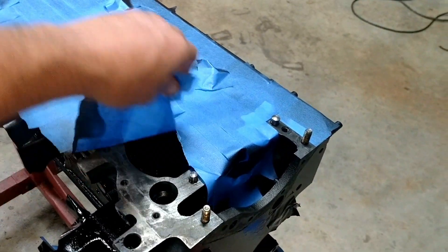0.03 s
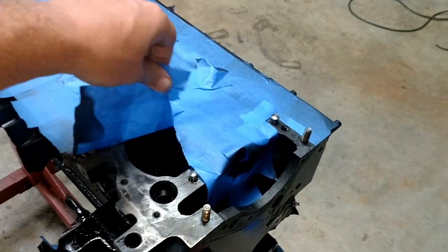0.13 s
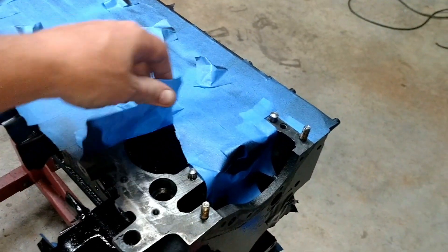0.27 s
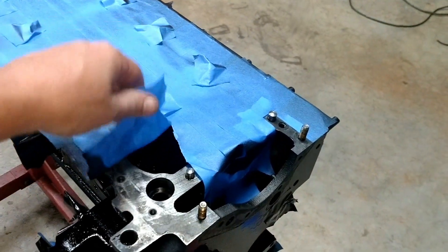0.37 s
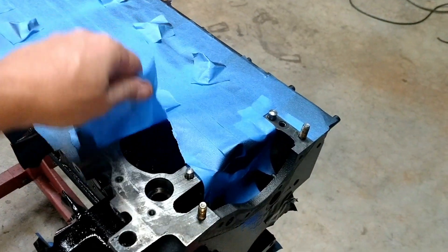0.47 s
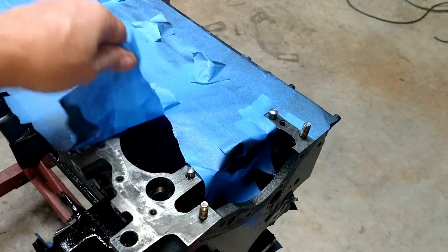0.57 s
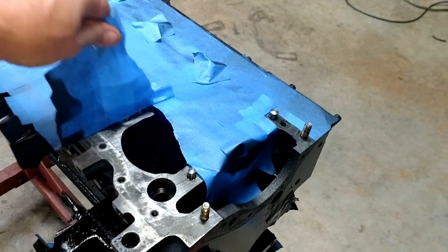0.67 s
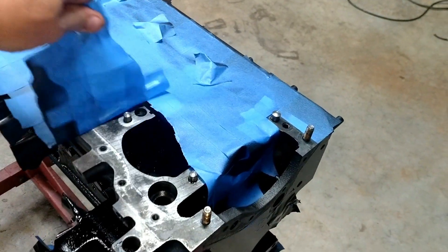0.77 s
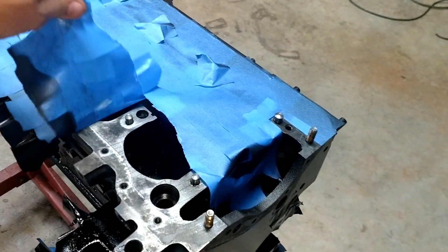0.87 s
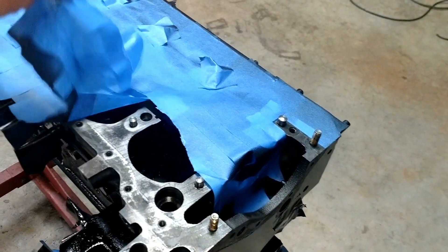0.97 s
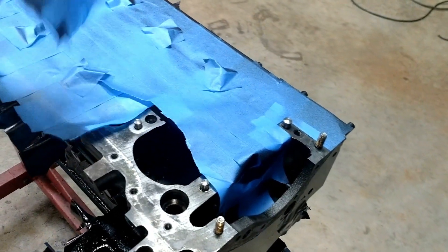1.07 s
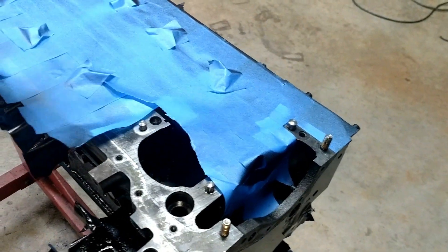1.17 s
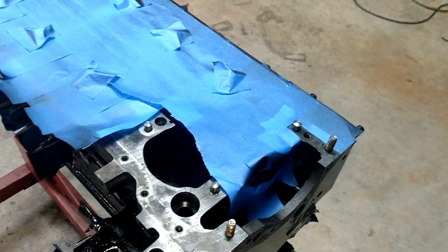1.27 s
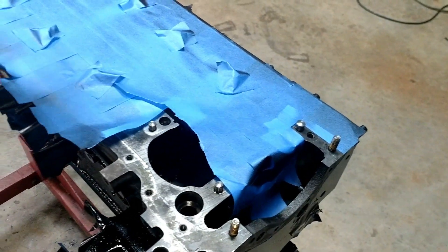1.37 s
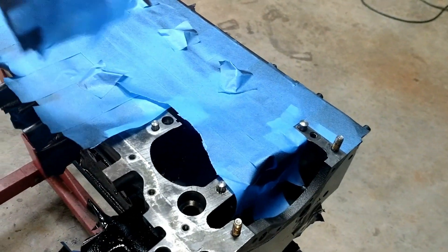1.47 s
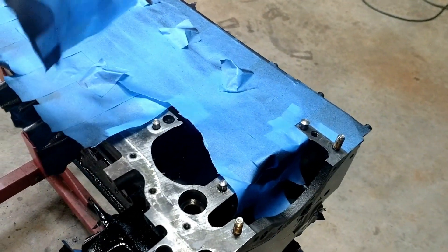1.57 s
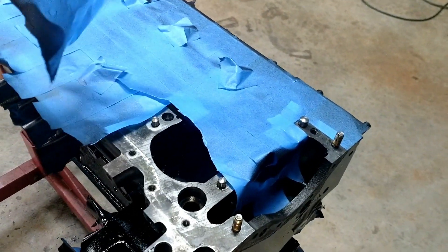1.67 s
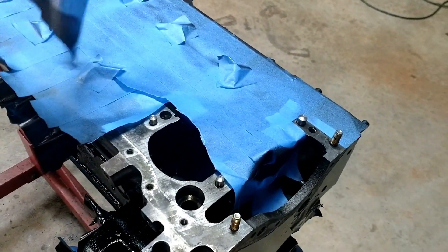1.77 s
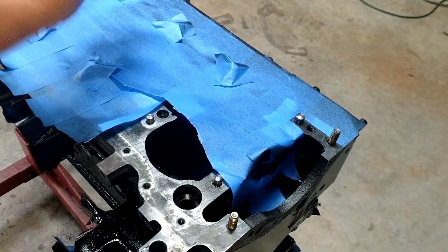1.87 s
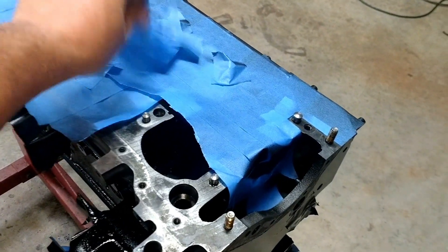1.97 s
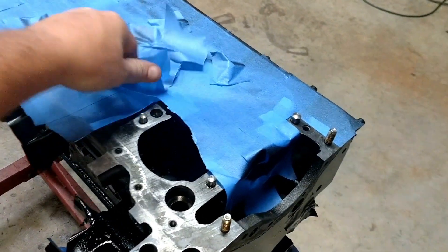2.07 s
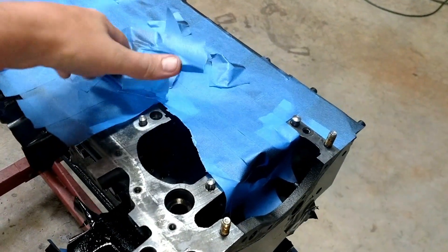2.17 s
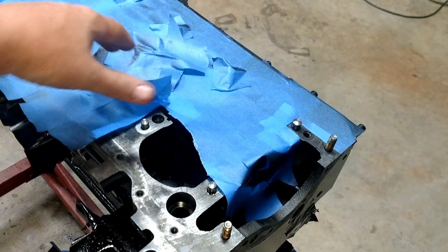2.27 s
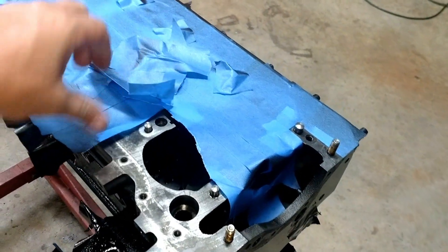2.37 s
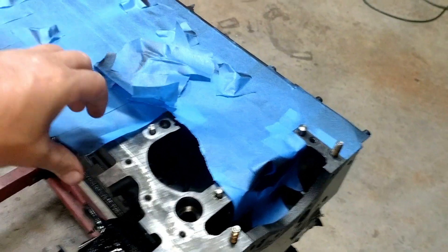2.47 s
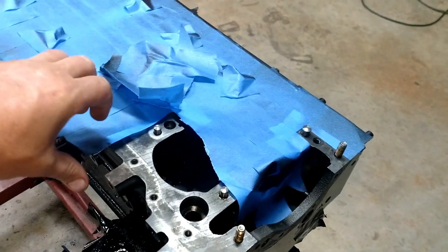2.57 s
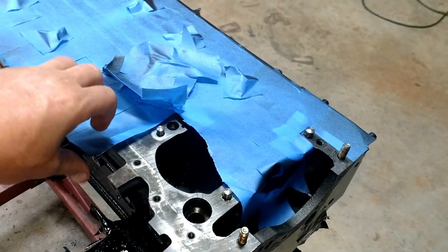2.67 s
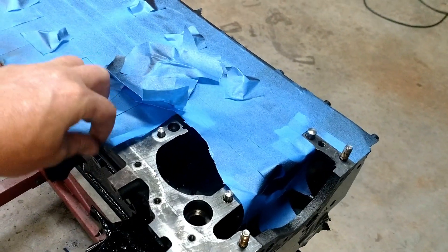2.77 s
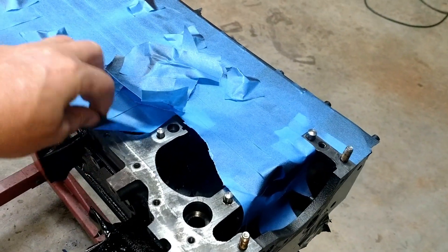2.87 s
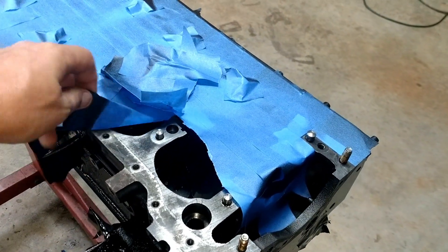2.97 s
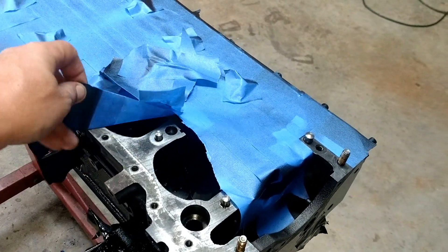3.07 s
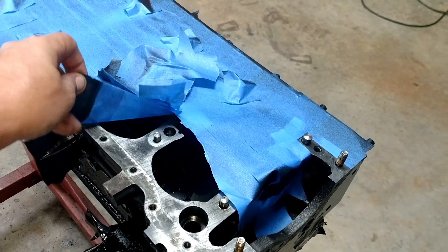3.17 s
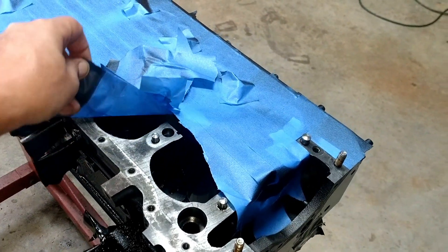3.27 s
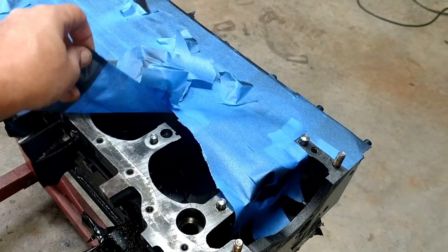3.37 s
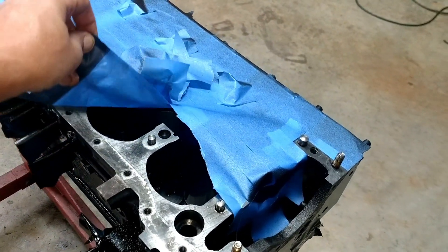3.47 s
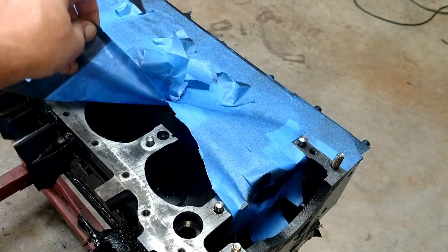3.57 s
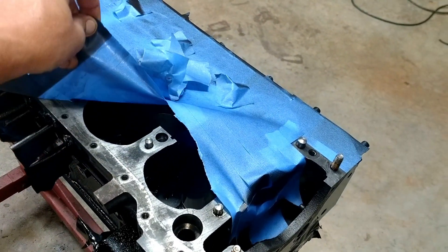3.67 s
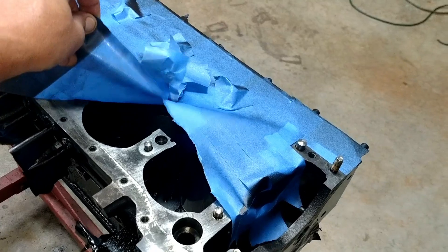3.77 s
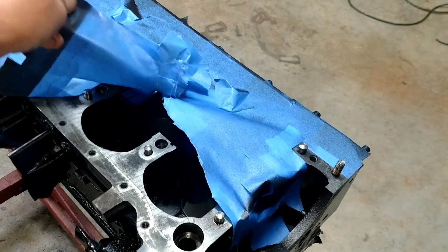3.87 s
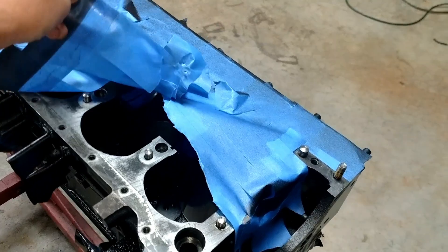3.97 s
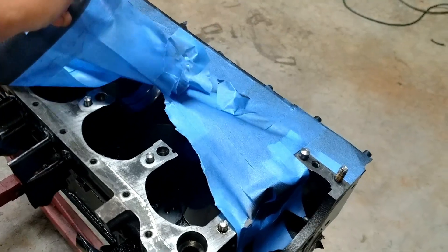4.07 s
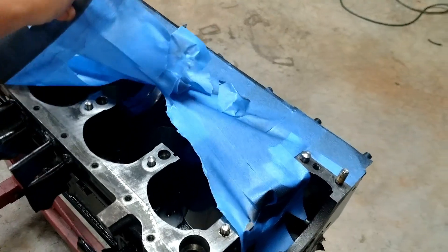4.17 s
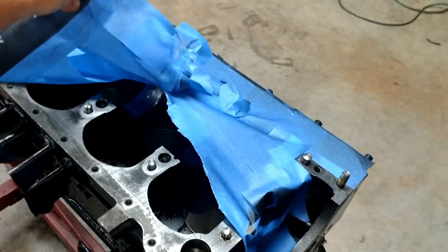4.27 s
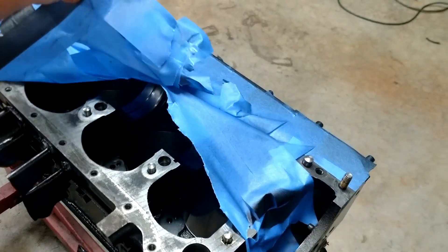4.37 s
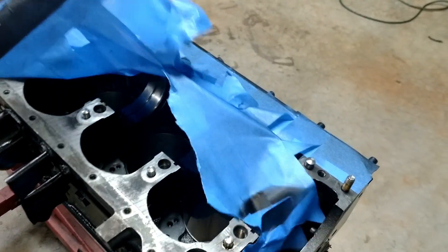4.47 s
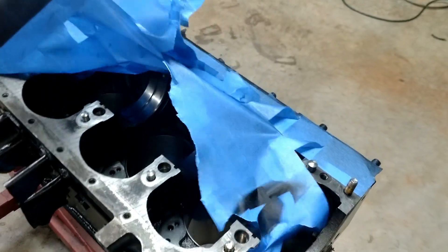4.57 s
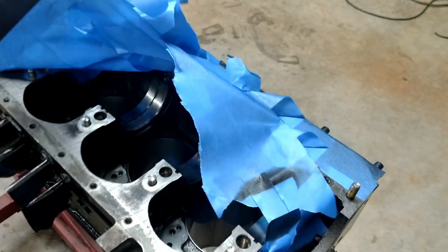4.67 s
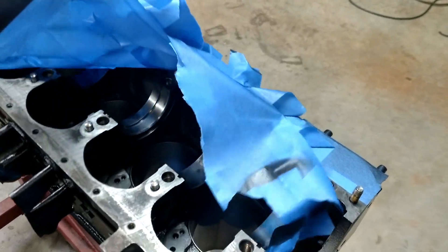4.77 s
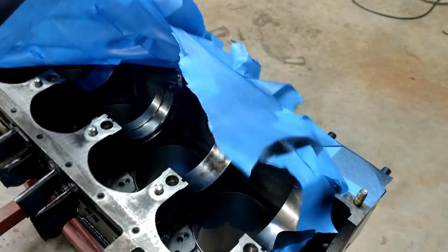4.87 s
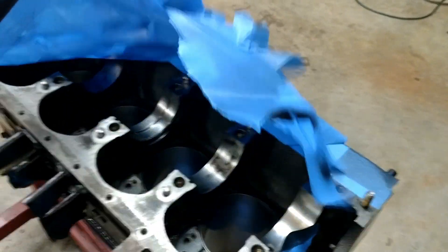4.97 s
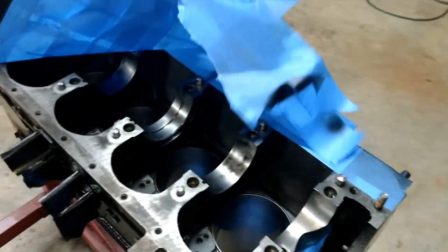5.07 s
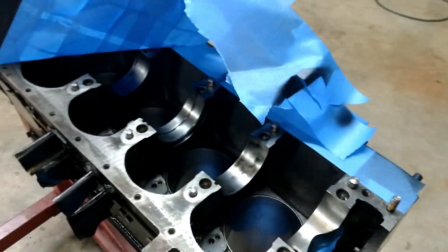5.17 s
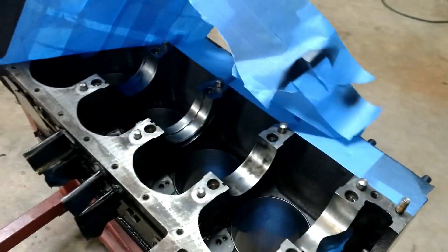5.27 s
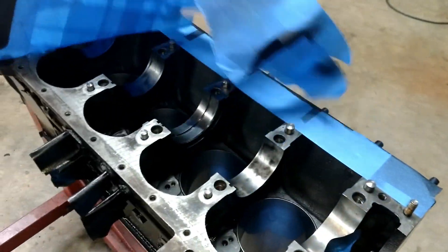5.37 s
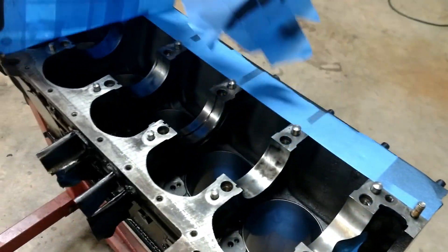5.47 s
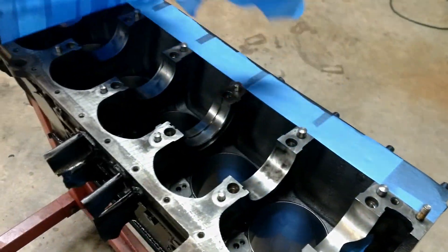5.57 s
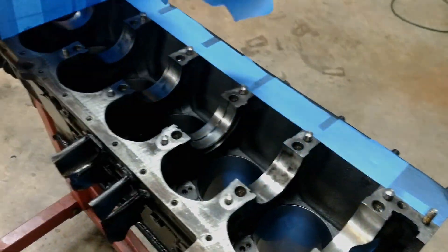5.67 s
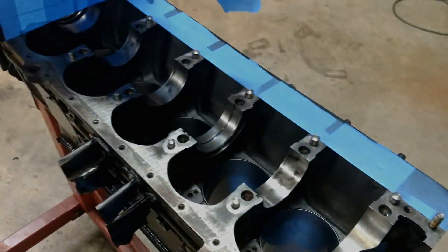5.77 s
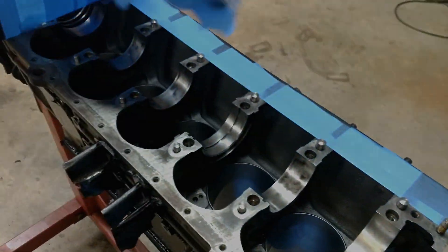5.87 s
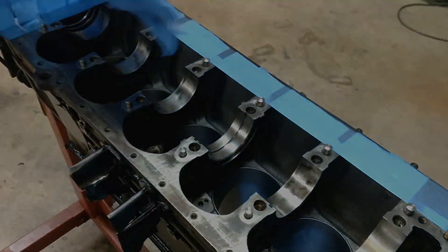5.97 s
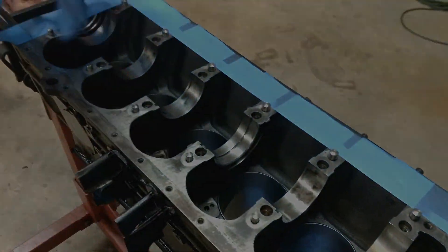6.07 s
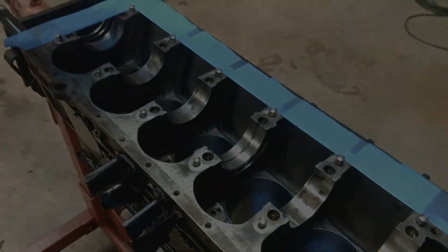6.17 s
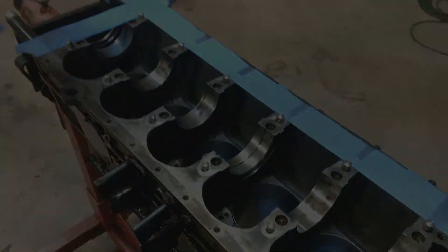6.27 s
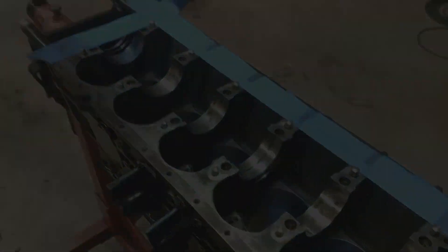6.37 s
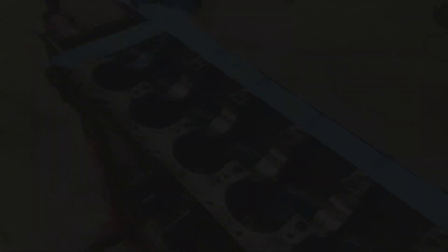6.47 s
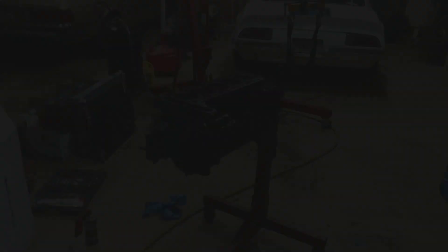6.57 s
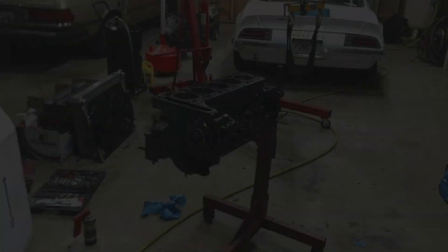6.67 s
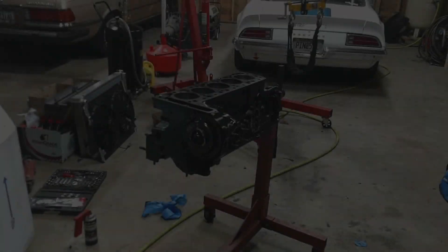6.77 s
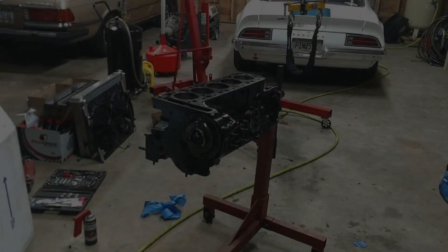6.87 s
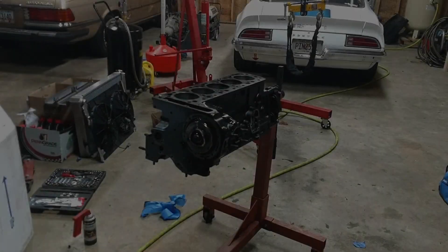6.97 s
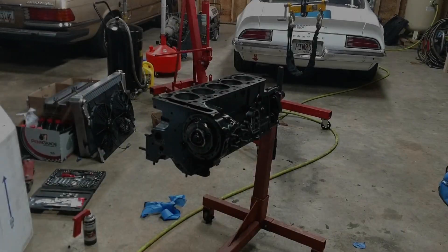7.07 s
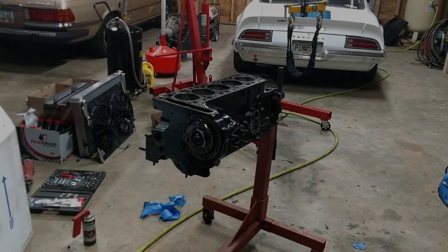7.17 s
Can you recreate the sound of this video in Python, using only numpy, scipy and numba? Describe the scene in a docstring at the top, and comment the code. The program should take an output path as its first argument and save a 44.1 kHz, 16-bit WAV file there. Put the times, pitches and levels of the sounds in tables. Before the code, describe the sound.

Very close in a garage, taped paper is torn from an engine block. A hard rip opens, followed by dense crackles and snaps, a near lull with light crumpling, then longer rips with the sheet drumming over hollow bores. The last scraps crackle away, the sound breaks off, and a small dull knock leads into quiet room air. Wide stereo phone pickup.

```python
"""Masking tape and paper are pulled off an engine block in a garage, close to a phone with two microphones.
From 0 s the glue lets go in stick-slip showers of clicks, the sheet drums over the bores, creases snap as
bursts of filtered clicks; hands rub softly and the garage rings briefly. A finger squeaks faintly, as a
trembling sine, at 2.6-3 s; the sheet clears the bores at 4.47 s. At 6.52 s the sound breaks off, a small
knock of damped sines follows at 6.66 s and the quiet room, coloured noise, comes back by 7.2 s."""
import sys
import numpy as np
from scipy import signal
from scipy.fft import rfft, irfft, next_fast_len
from scipy.io import wavfile
from scipy.ndimage import uniform_filter1d, map_coordinates
from numba import njit

SR = 44100
rng = np.random.default_rng(int(sys.argv[2]) if len(sys.argv) > 2 else 0)


def master(y):
    """Save y as 16-bit WAV."""
    cut = np.clip(np.atleast_2d(y).T, -1, 1)
    pcm = np.round(cut * 32767)  # scale
    wavfile.write(sys.argv[1], SR, pcm.astype(np.int16))


N = 318843

# Source levels are before the fade in scene() and the filters in record().
# relative spectrum of breaking glue and cracking creases: (frequency [Hz], density [dB])
CRACKLE_SPECTRUM = [(400, -21), (1400, -4), (2000, 10.5), (2800, 1.5), (3900, 0), (5100, -2), (6300, -0.5),
                    (7500, 2), (9500, -3), (11500, -6), (15500, -6)]
# relative spectrum of the drumming sheet: (frequency [Hz], density [dB])
SHEET_SPECTRUM = [(30, -14), (100, -21), (190, -1), (300, 0.5), (420, 1.5), (620, -5.5), (950, -2),
                  (1350, -5), (1800, 7.5), (2600, -8.5), (6000, -24)]
# changing shape of the sheet: (time [s], coupling to bores [dB], taut-tape pitch [Hz], taut-tape share [dB],
# loose-panel pitch [Hz], billowing share [dB])
SHEET_SHAPE = [(0, -4.5, 3000, -8.5, 603, -34), (.14, 3, 2840, -12, 855, -32),
               (.55, -14, 5460, -13.5, 710, -24), (.88, 0, 7100, -7.5, 640, -11),
               (1.04, 2, 5870, 1, 940, -28.5), (2.2, 3, 5330, -8.5, 820, -7.5),
               (2.8, -4.5, 5800, -6.5, 790, -9), (3.3, -4.5, 5100, 1.5, 590, -25),
               (3.6, 3.5, 5340, -11, 530, -5), (3.9, 1, 4730, -4.5, 900, -21),
               (4.3, 2.5, 4750, -11.5, 480, -23.5), (5.1, 1, 7400, -8, 1190, -6),
               (5.5, -2, 6940, -4, 1310, -13), (5.68, 6, 5480, -2, 1310, -7.5),
               (6.2, -13, 5250, -9.5, 1284, -11.5)]
# peeling front seen from the phone: (time [s], lag at left microphone [s], treble left minus right [dB])
PEEL_FRONT = [(0, 0.00035, -3.5), (.15, 0.00036, 3.5), (.33, 0.00018, -7), (.63, 0.00023, 2),
              (.83, 0.00014, 4.5), (.97, 0.0002, 3), (1.04, .00014, 1.5), (1.12, 0.00016, 2),
              (2.1, 0.00018, 2.5), (2.7, 0.00026, -8), (3.05, 0.00019, 4), (3.3, 0.00016, -3),
              (3.47, 0.00019, 0), (3.65, 0.00017, 7), (4.15, 0.0002, 2.5), (4.5, 0.00018, -0.5),
              (4.85, 0.00019, -2.5), (5.1, 0.00017, 0.5), (5.45, 0.00015, 1), (5.62, 0.00018, 4),
              (5.95, 0.00019, 0), (6.4, 0.00023, -6)]
# the sound breaks off and comes back: (time [s], gain [dB])
BREAK_FADE = [(6.522, 2), (6.53, -33), (6.6, -12.5), (6.72, -4), (6.85, -1), (7.05, 1.5), (7.23, 2.5)]

BORES_OPEN_S = 4.47  # the sheet comes clear of the bores
MIC_SPAN_S = 0.0004607  # travel time of sound between the microphones
SHEET_LAG_S = 0.00015  # the sheet lies a little nearer to the right microphone
TOP_HZ = 15900


def peeling(crackle_gain, drum_gain, patches=2):
    """Glue threads break along a wide front and ring the taut tape; the jerks shake sheet and bore air."""
    # top treble of the crackle: (time [s], gain [dB])
    fizz_rows = [(0, -3.5), (.17, 0.5), (.55, 0.5), (1.1, -10.5), (1.6, -4), (2.1, 0), (2.7, -6), (3.3, -8),
                 (3.9, 3.5), (4.2, 1), (4.55, 0), (5.5, -4.5), (6.05, 2)]
    # lower-treble rasp of the crackle: (time [s], gain [dB])
    rasp_rows = [(0, 5.5), (.8, -4), (1.1, 0.5), (2.7, 3.5), (3.1, -1.5), (3.27, 7), (3.42, 1), (3.85, -2),
                 (4.3, 5), (4.6, -5), (5, -2), (5.25, -0.5), (5.45, -1), (6.1, 0)]
    fizz_hz, rasp_hz, rasp_width_hz = 9450, 2120, 600
    panel_damping, tape_damping, ring_damping = 0.86, 0.61, 0.055  # width over pitch
    smooth_rip_db = -30  # jerks run together in pulls harder than this
    front_lag_s = .000019  # lag of the front's ends relative to its middle

    cover_db, tape_hz, tape_db, panel_hz, billow_db = curve(SHEET_SHAPE)
    fizz_db, = curve(fizz_rows)
    rasp_db, = curve(rasp_rows)
    lag_s, _ = curve(PEEL_FRONT)
    opened = np.arange(N) / SR > BORES_OPEN_S
    tear = tear_pitch()
    speed = crackle_gain / undb(smooth_rip_db)
    slip = stick_slip(rate_per_s=190, relax_s=0.003, spread_db=3.1, steady=0.25 + speed ** 2)
    out = 0
    for place in np.linspace(-1, 1, patches):
        threads = slip * clicks(N, rate_per_s=4500, spread_db=2.0)
        plucks = slip * clicks(N, rate_per_s=3000, spread_db=0.0)

        sharp_ring = unit(glide(plucks, tape_hz * tear ** (1 / 4), ring_damping))
        broad_ring = unit(glide(plucks, tape_hz * tear, tape_damping))
        tape = unit(broad_ring + undb(-12.5) * sharp_ring)
        glue = unit(colour(threads, CRACKLE_SPECTRUM))
        glue = glue + (undb(rasp_db) - 1) * band(glue, rasp_hz, rasp_width_hz)
        crackle = shelf(glue, fizz_hz, fizz_db) + undb(tape_db) * tape

        tugs = unit(threads + slip * clicks(N, rate_per_s=1200, spread_db=0.5))
        panel = slip * clicks(N, rate_per_s=1600, spread_db=-0.5)
        for _ in range(2):
            panel = glide(panel, panel_hz * tear, panel_damping)
        billow = unit(glide(tugs, panel_hz / 3.57, 0.95))  # the whole sheet swings far below its panels
        # the less it couples to the bores, the more the sheet rings by itself
        loose = undb(-.5 * cover_db) * (undb(-4.5) * unit(panel) + undb(billow_db) * billow)
        shaken = undb(-3.0) * unit(colour(tugs, SHEET_SPECTRUM))
        drum = shaken + undb(cover_db - 1.0) * bores(plucks, opened) + loose

        patch = crackle_gain * unit(crackle) + drum_gain * unit(drum)
        out = out + moving_ports(patch, lag_s + place * front_lag_s)
    return out / np.sqrt(patches)


def pulling():
    """Each pull's force, as two gains: glue crackle and sheet drumming."""
    # pulls: (start [s], length [s], crackle midway [dB], swell start to end [dB], drumming over crackle [dB])
    pull_rows = [(0, 0.025, -28.5, 2.5, 4), (0.031, 0.14, -30, -11, 0.5), (0.49, 0.031, -44, -2.5, 0.5),
                 (0.537, 0.046, -29.5, 3.5, -2.5), (0.604, 0.14, -33, 7, -3), (0.761, 0.19, -43, -4, 1),
                 (0.925, 0.045, -41.5, -2.5, -0.5), (0.968, 0.069, -37.5, 3.5, 1),
                 (1.05, 0.07, -40, -0.5, -0.5), (1.13, 0.13, -74.5, -23, -2),
                 (1.603, 0.041, -65.5, 8, -0.5), (1.768, 0.044, -73, 16, -0.5),
                 (2.072, 0.11, -47, -2.5, -3), (2.195, .15, -62, -11, 4), (2.62, 0.49, -68, -4.5, 11),
                 (2.823, 0.067, -55, 2, -3), (2.888, 0.095, -60, 7.5, -8), (2.975, 0.096, -61, -7, -7.5),
                 (3.073, 0.2, -51.5, 15, -2.5), (3.281, 0.18, -45, 11.5, -2), (3.501, 0.37, -43.5, -5, -3),
                 (3.849, 0.077, -33, 0.5, 2.5), (4.05, 0.17, -59.5, 11, -15),
                 (4.054, 0.053, -53.5, 4.5, 4.5), (4.124, 0.1, -48.5, -13.5, 2),
                 (4.25, 0.23, -49.5, 6.5, 0), (4.493, 0.071, -33, -2.5, -3.5),
                 (4.574, 0.16, -39, 5.5, -5.5), (4.741, 0.049, -50, 2, -0.5), (4.808, 0.29, -41, -7.5, -6),
                 (5.016, 0.16, -39.5, -0.5, -3.5), (5.184, 0.022, -51.5, -8, 3),
                 (5.222, 0.22, -40.5, 15.5, -4), (5.435, 0.13, -32, 2.5, -2.5),
                 (5.589, 0.04, -44, 19, -8.5), (5.635, 0.17, -44, -15.5, -4), (5.713, 0.054, -56, 1, 7),
                 (5.815, 0.097, -56.5, 10.5, 2), (5.913, 0.015, -51.5, 1, -3), (5.923, 0.18, -42.5, 10, -1)]
    attack_s, release_s = 0.00043, 0.0056  # the glue starts to give; it holds again
    crackle, drum = 0, 0
    for start_s, length_s, db, swell_db, drum_db in pull_rows:
        gain = stroke(start_s, length_s, db, swell_db, attack_s, release_s)
        crackle = crackle + gain
        drum = drum + gain * undb(drum_db)
    return crackle, drum


def stroke(start_s, length_s, db, swell_db, attack_s, release_s):
    """Gain of one hand movement: it sets in, swells or slackens evenly in dB, and lets go."""
    t = np.arange(N) / SR - start_s
    held = undb(db + swell_db * (np.clip(t / length_s, 0, 1) - .5))
    return held * np.clip(t / attack_s, 0, 1) * np.exp(-np.maximum(t - length_s, 0) / release_s)


def stick_slip(rate_per_s, relax_s, spread_db, steady):
    """Tension lets go in uneven jerks, each dying away at once, over a steady share."""
    size = undb(spread_db * np.minimum(rng.exponential(size=N), 3))
    jerks = (rng.random(N) < rate_per_s / SR) * size
    release = signal.lfilter([1], [1, -np.exp(-1 / (relax_s * SR))], jerks)
    return np.sqrt((steady + release / release.mean()) / (steady + 1))


def tear_pitch():
    """Pitch factor per small tear: each frees a strip of another length, which rings at another pitch."""
    tears_per_s, scatter_oct = 28, 0.3
    tear_index = np.cumsum(rng.random(N) < tears_per_s / SR)
    octaves = scatter_oct * rng.uniform(-1.55, 1, N)[tear_index]
    return 2 ** uniform_filter1d(octaves, size=88)  # 2 ms transitions


def bores(x, opened):
    """Air in bores and crankcase resonates; the balance changes as the sheet comes clear (opened 0-1)."""
    # air resonances: (frequency [Hz], width [Hz], relative level covered [dB], relative level open [dB])
    air_modes = [(328, 43, -5.5, -3.5), (422, 70, 4, -1), (479, 50, 0.5, 3), (522, 33, -3.5, 2),
                 (655, 45, -2, -18.5), (851, 110, -2.5, -8), (970, 70, -10, -9.5), (1115, 37, -9, -13),
                 (1236, 88, -3, -4.5), (1344, 100, -9, -1)]
    total = 0
    for hz, width_hz, shut_db, open_db in air_modes:
        gain = undb(shut_db) * (1 - opened) + undb(open_db) * opened
        total = total + gain * band(x, hz, width_hz)
    return unit(total)


def snaps():
    """Big creases buckle and tape jerks free, each at its moment."""
    # snaps: (time [s], decay [s], crack level [dB], crack centre [Hz], flap level [dB], flap centre [Hz])
    snap_rows = [(0.152, 0.0019, -25.5, 4570, -41.5, 740), (0.3241, 0.0019, -40, 4300, -44, 1110),
                 (.391, 0.0067, -47, 4020, -46, 690), (0.443, 0.0034, -41, 2530, -39, 900),
                 (0.479, 0.0027, -54, 2990, -42, 900), (0.4915, 0.002, -44, 5000, -43, 480),
                 (0.5256, 0.0019, -25, 3580, -28, 930), (0.5503, 0.0025, -25.5, 4670, -31, 594),
                 (0.5668, .0032, -32, 5860, -48, 850), (0.5835, 0.0012, -38, 6000, -25, 600),
                 (0.6398, 0.0011, -32, 4100, -26, 930), (0.6685, 0.0041, -32, 4420, -44.5, 658),
                 (.6847, 0.0042, -31, 4860, -26.5, 843), (0.696, 0.0031, -25.5, 3470, -26.5, 1074),
                 (0.7147, 0.0087, -42, 5900, -31, 790), (0.7645, 0.0034, -24.5, 6160, -27, 546),
                 (0.782, 0.00097, -29.5, 6500, -41.5, 700), (.7887, 0.002, -32, 5750, -36, 590),
                 (0.814, 0.0015, -34, 6400, -32.5, 460), (0.8373, 0.0014, -30, 6100, -39, 450),
                 (0.8715, 0.0021, -28.5, 6800, -48, 1280), (0.9334, 0.0022, -26.5, 5300, -30, 520),
                 (0.9437, 0.0019, -27.5, 6440, -32, 530), (1.0437, 0.00041, -24, 4400, -24, 990),
                 (1.155, .002, -47, 5970, -68, 600), (1.487, 0.0013, -89, 3960, -65, 796),
                 (1.64, 0.0021, -56, 4500, -56, 800), (1.887, 0.00088, -61, 4000, -54.5, 1300),
                 (1.9293, 0.0012, -44, 2410, -42.5, 1670), (2.052, 0.0041, -45, 3840, -45.5, 535),
                 (2.0921, 0.0022, -38, 7500, -40.5, 600), (2.1065, 0.0018, -37.5, 7000, -41, 900),
                 (2.1101, 0.0048, -41, 4320, -32.5, 784), (2.1464, 0.0015, -41, 5830, -60, 530),
                 (2.1654, 0.0017, -35, 4970, -41, 470), (2.1807, 0.003, -36, 3270, -39, 830),
                 (2.192, 0.0019, -37.5, 6000, -39.5, 600), (2.216, 0.0012, -35.5, 6100, -44.5, 530),
                 (2.6521, 0.00086, -63, 2500, -53.5, 460), (3.167, 0.0018, -64, 5000, -47.5, 675),
                 (3.3655, 0.0022, -49, 4950, -51, 600), (3.4179, 0.0013, -28.5, 4470, -31.5, 630),
                 (3.4313, 0.0024, -28.5, 5360, -23, 554), (3.4461, 0.021, -43, 2700, -32, 490),
                 (3.4705, 0.0042, -24, 4400, -29.5, 446), (3.4819, 0.0018, -23, 5300, -28.5, 590),
                 (3.495, 0.0017, -32.5, 5500, -27, 520), (3.5805, 0.0039, -45, 4500, -35, 615),
                 (3.602, 0.00083, -37, 4600, -36.5, 506), (3.692, 0.0028, -28, 3560, -26, 450),
                 (3.7837, 0.0018, -40, 5460, -40, 710), (3.8336, 0.0014, -34, 3260, -35, 760),
                 (3.8487, 0.0026, -27.5, 3500, -44.5, 1000), (3.8568, 0.004, -30, 4000, -27, 480),
                 (3.8883, 0.001, -25, 5970, -31.5, 780), (3.9045, 0.0025, -44, 5760, -32, 890),
                 (3.9308, 0.0018, -23, 6940, -26, 488), (4.053, 0.0013, -38, 2420, -34, 476),
                 (4.0848, 0.0023, -44, 3300, -30, 603), (4.098, 0.0012, -40, 3046, -32.5, 1110),
                 (4.127, 0.0046, -31.5, 7000, -49, 760), (4.16, 0.0045, -38, 6500, -44, 820),
                 (4.2764, 0.0027, -38, 2030, -29, 405), (4.298, 0.003, -36, 4300, -35.5, 1210),
                 (4.5, 0.0085, -30.5, 5540, -45.5, 432), (4.524, .002, -38, 5040, -32, 685),
                 (4.544, 0.0038, -40, 3650, -34, 1160), (4.5672, 0.0068, -31, 5170, -37.5, 570),
                 (4.6853, 0.004, -26.5, 5360, -35.5, 650), (4.7281, 0.0037, -36, 5860, -39, 1230),
                 (4.7928, 0.0015, -29, 4660, -33.5, 810), (4.8752, 0.0036, -32, 4640, -35, 950),
                 (5.032, 0.005, -26.5, 7900, -39.5, 285), (5.083, 0.0011, -25.5, 5200, -50, 750),
                 (5.215, 0.001, -36, 6030, -38.5, 1510), (5.3155, 0.0013, -39, 7000, -49, 1200),
                 (5.3648, 0.0012, -38, 5500, -31.5, 1250), (5.3832, 0.0032, -28.5, 2700, -28, 1360),
                 (5.3975, 0.00091, -31.5, 7300, -45, 1200), (5.4495, 0.00063, -31, 7300, -34, 1200),
                 (5.513, 0.001, -37, 6500, -32, 1190), (5.543, 0.0014, -34, 6960, -32.5, 1300),
                 (5.5679, 0.0012, -26, 6940, -30, 1350), (5.825, 0.0042, -39.5, 6000, -48.5, 900),
                 (5.931, 0.0027, -39.5, 8160, -39, 720), (6.0135, 0.003, -32, 5600, -55, 900),
                 (6.037, 0.0037, -32.5, 6100, -49, 900), (6.082, 0.0011, -36, 8050, -39.5, 805),
                 (6.096, 0.0017, -35.5, 5370, -32.5, 744), (6.3718, 0.0003, -46.5, 4470, -51.5, 726),
                 (6.3902, 0.00018, -39, 4740, -50.5, 944)]
    out = np.zeros((2, N))
    for s, decay_s, crack_db, crack_hz, flap_db, flap_hz in snap_rows:
        add(out, s, snap(s, decay_s, undb(crack_db), crack_hz, undb(flap_db), flap_hz))
    return out


def snap(s, decay_s, crack_gain, crack_hz, flap_gain, flap_hz, size=4096):
    """A crease pops or runs through clicks: a bright crack and a lower flap of the panel around it."""
    rise_share = 0.7  # rise time over decay time
    pop_size, pop_loss_s = 10.4, 0.0007  # single pop of a fold; slower creases lose it
    t, decay_s = np.arange(size) / SR, max(decay_s, .0003)
    weight = np.sqrt(.005 * SR / size)  # gains are rms over 5 ms
    envelope = np.exp(-t / decay_s) * np.minimum(t / (rise_share * decay_s), 1)
    run = clicks(size, rate_per_s=14000, spread_db=1.0) * envelope
    run[int(.0005 * SR)] += pop_size * np.exp(-decay_s / pop_loss_s)
    splinter = undb(-8) * run  # leaves the crease without ringing it
    crack = colour(band(run, crack_hz, crack_hz * 0.78) + splinter, CRACKLE_SPECTRUM)
    flap = unit(colour(band(run, flap_hz, flap_hz * 0.59), SHEET_SPECTRUM))
    flap_in_bores = flap + undb(-6.5) * bores(flap, float(s > BORES_OPEN_S))
    sound = crack_gain * unit(crack) + flap_gain * unit(flap_in_bores)
    times_s, lags_s, _ = np.transpose(PEEL_FRONT)
    return weight * ports(sound, np.interp(s, times_s, lags_s) + .00002 * rng.standard_normal())


def creases(crackle_gain, drum_gain):
    """Small creases buckle at random, scaled by the pull up to a limit, and flap near the panel pitch."""
    per_s, decay_s, centre_hz = 12, 0.0011, 5640
    crack_db, flap_db = -7.5, -0.5  # over the pull's crackle and drumming
    scatter_db, scatter_oct = 2.5, 0.96  # plus or minus
    limit = undb(-38)  # harder pulls make them no louder
    out = np.zeros((2, N))
    *_, panel_hz, _ = curve(SHEET_SHAPE)
    for when, crack, flap, bright, pitch in rng.uniform(-1, 1, (int(per_s * N / SR), 5)):
        i = int((when + 1) / 2 * N)
        crack_gain = min(crackle_gain[i], limit) * undb(crack_db + scatter_db * crack)
        flap_gain = min(drum_gain[i], limit) * undb(flap_db + scatter_db * flap)
        crack_hz = centre_hz * 2 ** (scatter_oct * bright)
        flap_hz = panel_hz[i] * 2 ** (scatter_oct * pitch)
        add(out, i / SR, snap(i / SR, decay_s, crack_gain, crack_hz, flap_gain, flap_hz))
    return out


def shaded(near):
    """The phone's body shades the treble of one microphone or the other as the front moves."""
    shade_hz = 6200
    _, left_db = curve(PEEL_FRONT)
    return np.array([shelf(near[0], shade_hz, left_db / 2), shelf(near[1], shade_hz, -left_db / 2)])


def garage(near, wet_db, early_db, early_s, treble_db):
    """Quick scatter from the iron block, then the room's tail, shorter in the treble; fed by the right mic."""
    # garage reverberation: (frequency [Hz], T60 [s])
    t60_rows = [(100, 0.23), (280, 1.2), (400, 1.01), (1200, 0.94), (4000, 0.94), (8000, 0.61),
                (11000, 0.47), (15000, .27)]
    t = np.arange(SR) / SR
    hz, s, cells = signal.stft(diffuse(SR), SR, nperseg=256)
    fall_db = -60 * s / at_hz(t60_rows, hz)[:, None]
    dull_db = treble_db * hz[:, None] / TOP_HZ
    tail = signal.istft(cells * undb(fall_db + dull_db), SR)[1][:, :SR]
    tail = tail * (1 - np.exp(-(t / 0.0006) ** 2))
    early = diffuse(SR) * np.exp(-t / early_s) * (t > .0006)
    response = undb(wet_db) * tail / np.sqrt(SR / 20) + undb(early_db) * unit(early) / np.sqrt(SR)
    return signal.fftconvolve(near[1:], response, axes=1)[:, :N]


def squeak():
    """A fingertip catches and slips on the tape edge so fast that it whistles: a sine of trembling pitch."""
    # squeak: (time [s], pitch [Hz], level [dB])
    whistle = [(2.58, 6900, -100), (2.597, 7440, -78), (2.618, 8150, -71), (2.66, 8200, -76),
               (2.705, 7750, -73), (2.745, 7520, -70), (2.81, 7950, -72), (2.85, 7700, -72),
               (2.92, 7350, -73), (3.0, 7400, -80)]
    jitter = 0.006  # rms pitch tremble over pitch
    hz, db = curve(whistle)
    tremble = unit(band(rng.standard_normal(N), 150, 400))
    tone = unit(np.sin(2 * np.pi * np.cumsum(hz * (1 + jitter * tremble)) / SR))
    t = np.arange(N) / SR
    return ports(tone * undb(db) * (t > whistle[0][0]) * (t < whistle[-1][0]), SHEET_LAG_S)


def hands():
    """Skin drags over paper with a dull, soft rumble, close enough to differ at each microphone."""
    # hands sliding and pressing: (start [s], length [s], level midway [dB], swell start to end [dB])
    rub_rows = [(0, 1.12, -65, 9), (2.003, 0.91, -65.5, -13), (2.574, 1.4, -61.5, 8), (4.06, 1.26, -66, 3),
                (5.401, 1.12, -71.5, 6)]
    gain = sum(stroke(*rub, attack_s=0.14, release_s=0.016) for rub in rub_rows)
    common, *own = (clicks(N, rate_per_s=320, spread_db=5.0) for _ in range(3))
    drag = unit(band(band(common, 160, 180), 230, 350))
    flutter = unit(np.array([band(band(x, 82, 160), 100, 200) for x in own]))
    return gain * (ports(drag, SHEET_LAG_S) + undb(-6.0) * flutter)


def knock():
    """A small knock by the phone: damped sines for a short tick and a dull thump, with noise grit."""
    # knock: (tick level [dB], tick pitch [Hz], thump level [dB], thump pitch [Hz])
    tick_db, tick_hz, thump_db, thump_hz = (-41, 904, -37.5, 151)
    start_s = 6.6625
    t = np.maximum(np.arange(N) / SR - start_s, 0)
    tick = undb(tick_db) * np.sin(2 * np.pi * tick_hz * t) * np.exp(-t / 0.0018)
    thump = undb(thump_db) * np.sin(2 * np.pi * thump_hz * t) * np.exp(-t / 0.004)
    grit = undb(-23.5) * band(rng.standard_normal(N) * (t > 0) * np.exp(-t / 0.001), 2130, 2270)
    return ports(tick + thump + grit, SHEET_LAG_S)


def room_tone(db, rumble_db):
    """Still air as coloured noise: thin steady whines before the break, a faint rumble after it."""
    # relative spectrum of the air: (frequency [Hz], density [dB])
    air_spectrum = [(25, -15.5), (85, -3), (170, 1), (400, -5.5), (1000, -6.5), (2500, -10.5),
                    (5000, -12.5), (8000, -14), (11200, -17.5), (13000, -22), (15500, -22)]
    # steady whines: (frequency [Hz], width [Hz], level [dB])
    whine_rows = [(9895, 150, -84), (14790, 280, -83)]
    air = np.array([colour(x, air_spectrum) for x in diffuse(N)])
    rumble = np.array([band(band(x, 85, 70), 85, 90) for x in rng.standard_normal((2, N))])
    whine = 0
    for hz, width_hz, line_db in whine_rows:
        line = band(band(diffuse(N), hz, width_hz), hz, width_hz)
        whine = whine + undb(line_db) * unit(line)
    before_break = np.arange(N) / SR < BREAK_FADE[1][0]
    return undb(db) * unit(air) + np.where(before_break, whine, undb(rumble_db) * unit(rumble))


def undb(db):
    """Decibels to gain."""
    return 10 ** (np.asarray(db) / 20)


def unit(x):
    """Scale to rms 1."""
    return x / np.sqrt(np.mean(x ** 2) + 1e-18)


def curve(rows):
    """Columns of a time table, interpolated to every sample."""
    s, *columns = np.transpose(rows)
    return [np.interp(np.arange(N) / SR, s, c) for c in columns]


def at_hz(points, hz):
    """Read a table on a log-frequency axis."""
    f, value = np.transpose(points)
    return np.interp(np.log(hz + 1), np.log(f), value)


def colour(x, points, power=1, size=2048):
    """Minimum-phase filter with the given (Hz, dB) response, its dB times power."""
    response_db = power * at_hz(points, np.fft.rfftfreq(size, 1 / SR))
    cepstrum = irfft(np.log(undb(response_db)))
    cepstrum[1:size // 2] *= 2
    cepstrum[size // 2 + 1:] = 0
    return signal.fftconvolve(x, irfft(np.exp(rfft(cepstrum))))[:len(x)]


def band(x, hz, width_hz):
    """One resonance, gain 1 at its centre."""
    return signal.lfilter(*signal.iirpeak(hz, hz / width_hz, fs=SR), x + 1e-18)


@njit
def glide(x, hz, damping):
    """State-variable resonance whose pitch moves; damping is its width over its pitch."""
    y, b, low = np.empty(len(x)), 0., 0.
    for i in range(len(x)):
        g = np.tan(np.pi * hz[i] / SR)
        v = (b + g * (x[i] - low)) / (1 + g * (g + damping))
        b, low, y[i] = 2 * v - b, low + 2 * g * v, v
    return y


def shelf(x, hz, db):
    """Raise or lower everything above a frequency; the amount may move."""
    top = signal.sosfiltfilt(signal.butter(2, hz, "high", fs=SR, output="sos"), x)
    return x + (undb(db) - 1) * top


def clicks(n, rate_per_s, spread_db):
    """Random clicks of uneven size, at rms 1."""
    size = undb(spread_db * np.minimum(rng.exponential(size=n), 5))
    return unit((rng.random(n) < rate_per_s / SR) * size * rng.standard_normal(n))


def diffuse(n):
    """Noise from all sides: alike at both microphones only for long waves."""
    likeness = np.sinc(2 * np.fft.rfftfreq(n, 1 / SR) * MIC_SPAN_S)
    weights = np.sqrt([1 + likeness, 1 - likeness])
    mid, side = irfft(rfft(rng.standard_normal((2, n))) * weights, n)
    return np.array([mid + side, mid - side]) / np.sqrt(2)


def delay(x, seconds):
    """Delay by any fraction of a sample."""
    n = next_fast_len(len(x) + 64)
    turn = np.exp(-2j * np.pi * np.fft.rfftfreq(n, 1 / SR) * seconds)
    return irfft(rfft(x, n) * turn, n)[:len(x)]


def ports(x, lag_s):
    """A near sound at the two microphones; it reaches the left one later."""
    return np.array([delay(x, lag_s), x])


def moving_ports(x, lag_s):
    """A moving sound at the two microphones: the left lag changes sample by sample."""
    return np.array([map_coordinates(x, [np.arange(N) - lag_s * SR], order=5, mode="mirror"), x])


def add(out, s, sound):
    """Mix a short sound in at its time."""
    part = out[:, int(s * SR):][:, :sound.shape[1]]
    part += sound[:, :part.shape[1]]


def scene():
    """Tape and paper in the garage, as they reach the two microphones."""
    background = hands() + squeak() + room_tone(db=-65.0, rumble_db=-72.0)
    crackle_gain, drum_gain = pulling()
    near = peeling(crackle_gain, drum_gain) + snaps() + creases(crackle_gain, drum_gain)
    room = garage(near, wet_db=-11.0, early_db=-6.0, early_s=0.0096, treble_db=-1.0)
    fade_db, = curve(BREAK_FADE)
    return (shaded(near) + room + background) * undb(fade_db) + knock()  # the knock is not faded


def widen(pair, bass_hz, lowest_hz):
    """Delay each microphone and subtract a share of the other, for width; then put the lost bass back."""
    # share of the other microphone subtracted: (frequency [Hz], share [1])
    cross_rows = [(100, .8), (900, .83), (2200, .93), (4400, .76), (6500, .4), (9000, .1), (15000, .01)]
    n = next_fast_len(N + SR // 10)
    hz, both = np.fft.rfftfreq(n, 1 / SR), rfft(pair, n)
    share = at_hz(cross_rows, hz)
    aimed = np.exp(-2j * np.pi * hz * MIC_SPAN_S) * both - share * both[::-1]
    bass = (1j * hz + bass_hz) / (1j * hz + lowest_hz)
    return irfft(aimed * bass / np.sqrt(1 + share ** 2), n)[:, :N]


def record(dry):
    """Each microphone opening has its own colour; the phone widens the stereo picture and cuts the top."""
    # colour of the openings, scaled by power for each: (frequency [Hz], unscaled gain [dB])
    opening_rows = [(100, 1), (450, 0.5), (1100, 2.5), (2000, 5), (3100, 6), (4800, 0.5), (6000, 5),
                    (8000, 3.5), (10500, 2), (13000, 0), (15000, -1)]
    left = colour(dry[0], opening_rows, power=0.077)
    right = colour(dry[1], opening_rows, power=-1.83)
    wide = widen(np.array([left, right]), bass_hz=330, lowest_hz=77.0)
    return signal.sosfilt(signal.ellip(10, .2, 70, TOP_HZ, fs=SR, output="sos"), wide)


dry = scene()
out = record(dry)
master(out)
```